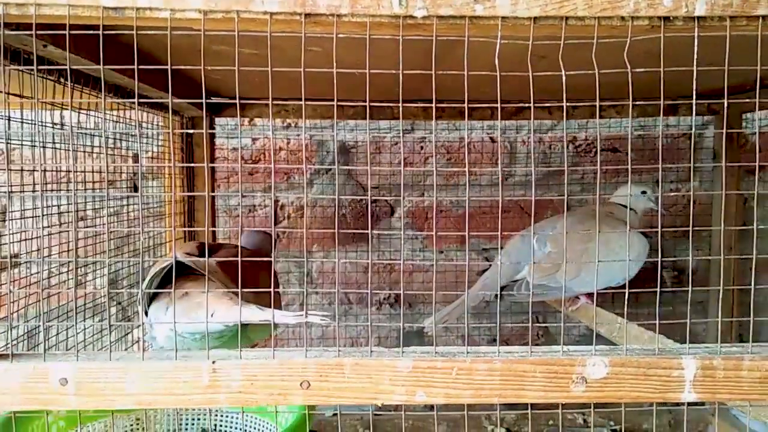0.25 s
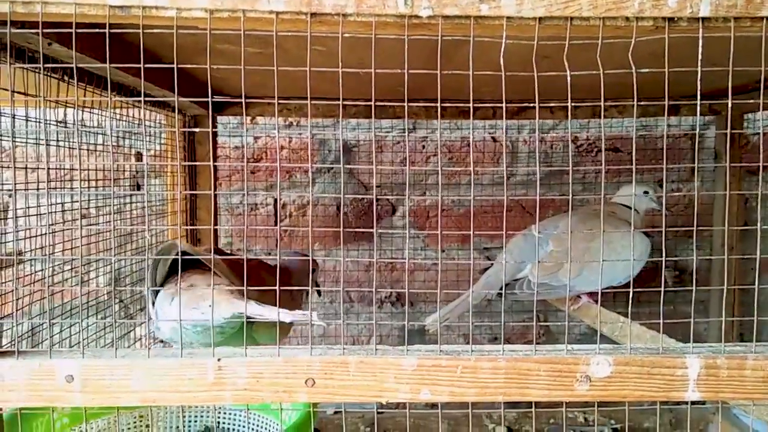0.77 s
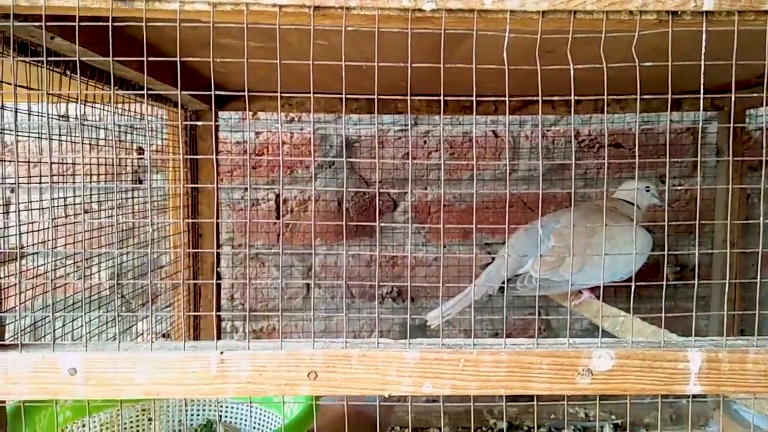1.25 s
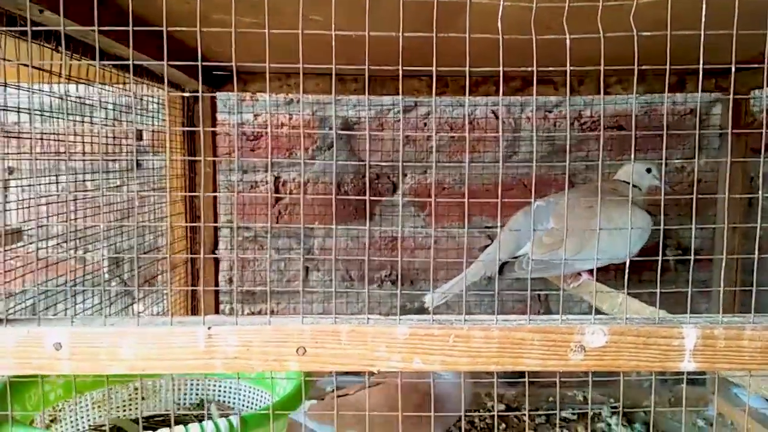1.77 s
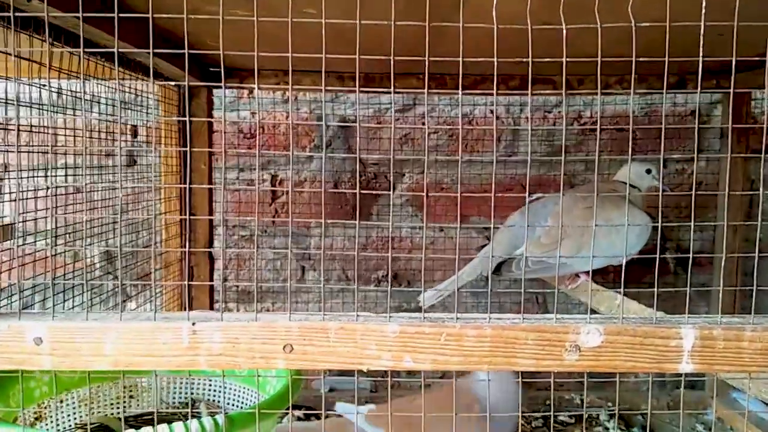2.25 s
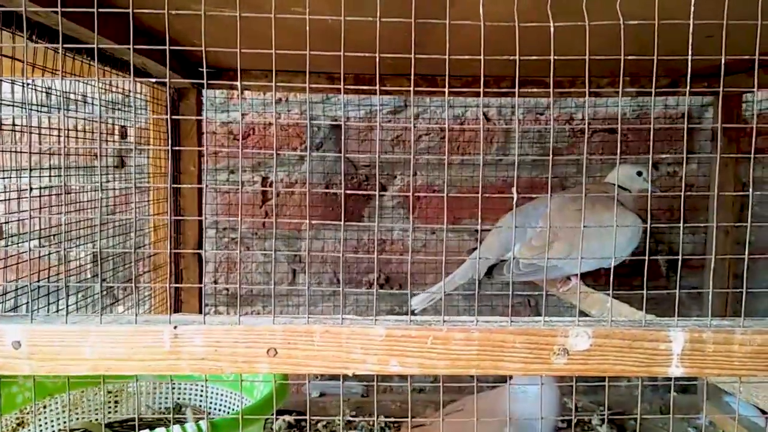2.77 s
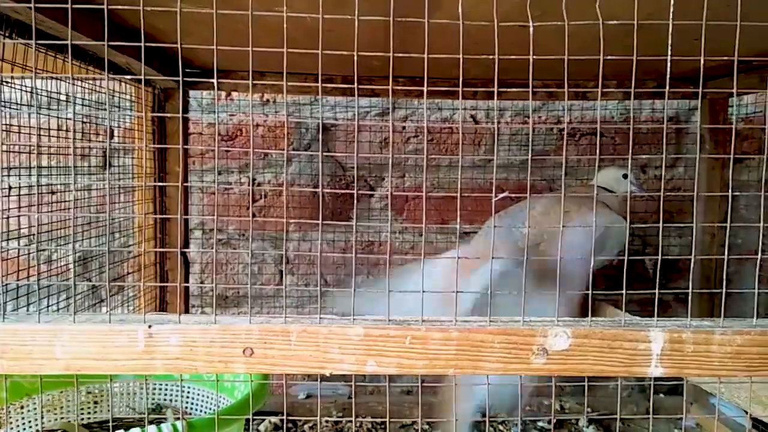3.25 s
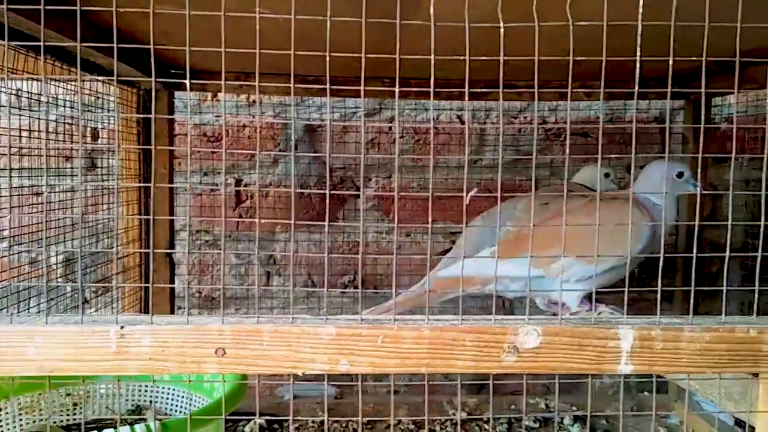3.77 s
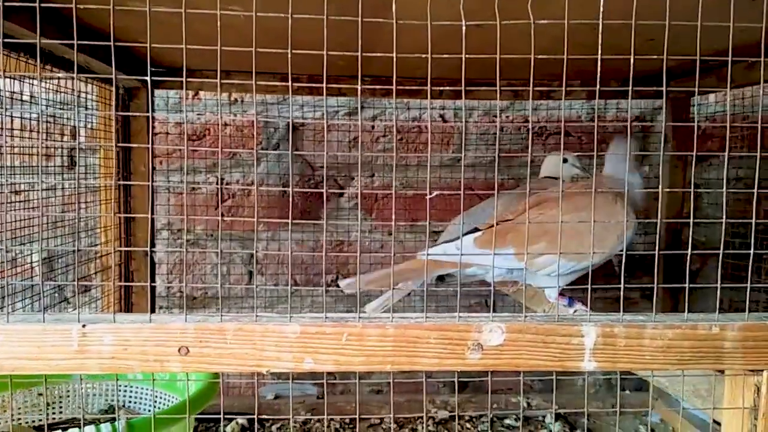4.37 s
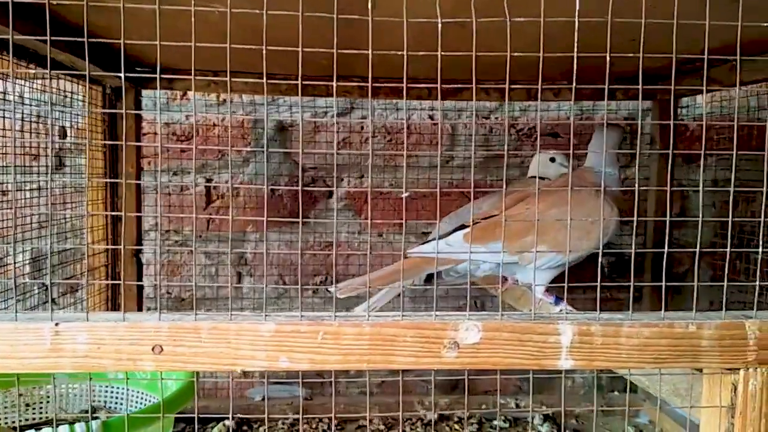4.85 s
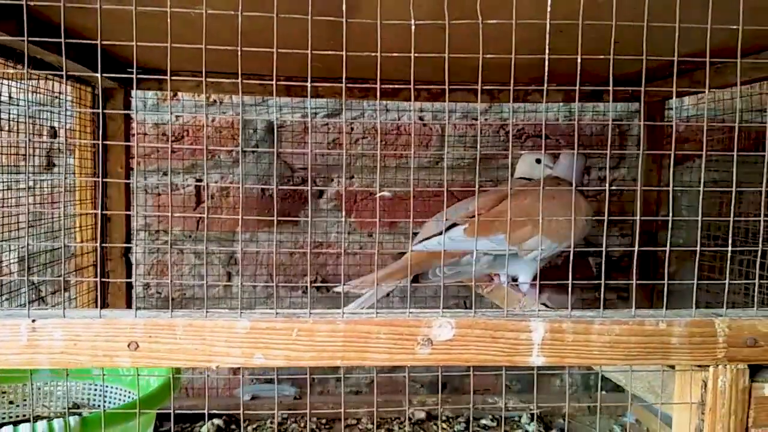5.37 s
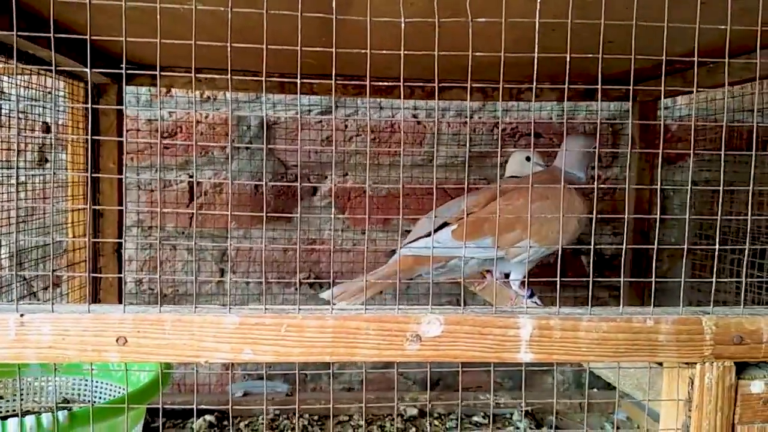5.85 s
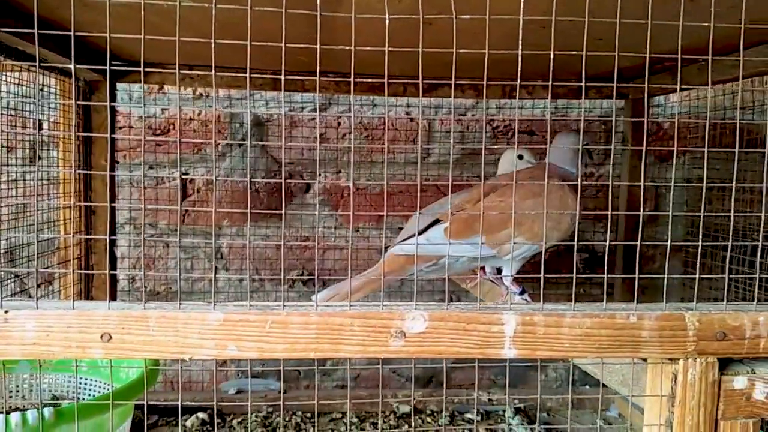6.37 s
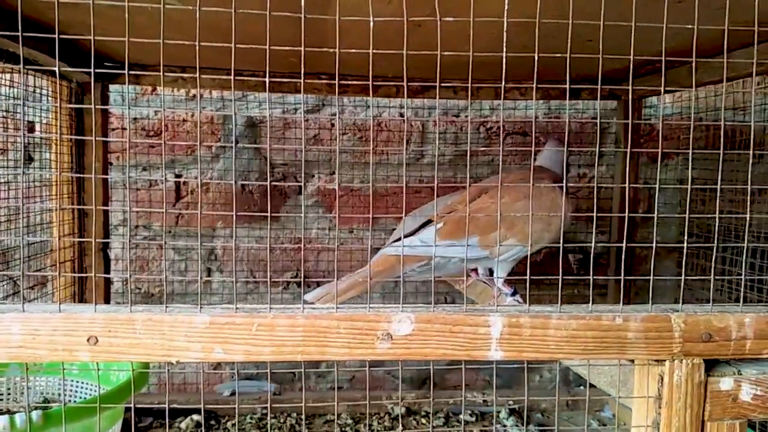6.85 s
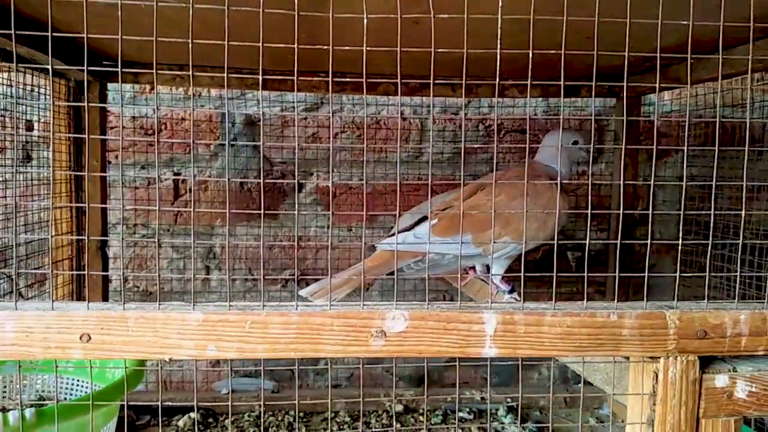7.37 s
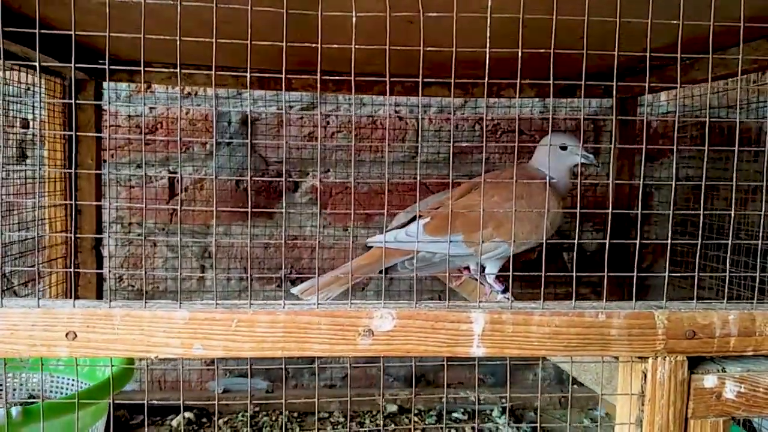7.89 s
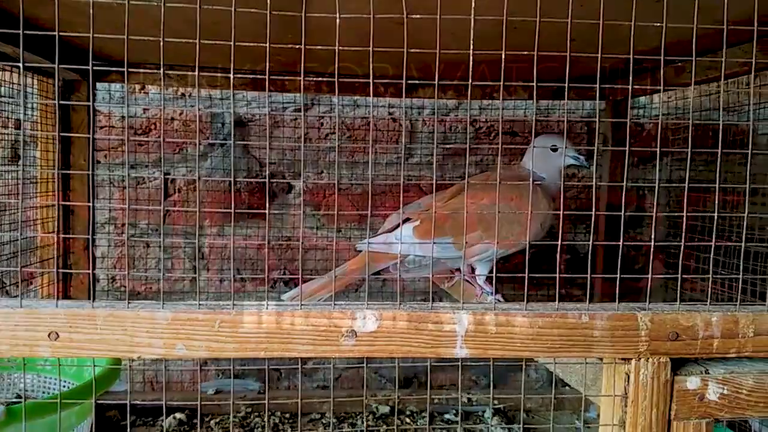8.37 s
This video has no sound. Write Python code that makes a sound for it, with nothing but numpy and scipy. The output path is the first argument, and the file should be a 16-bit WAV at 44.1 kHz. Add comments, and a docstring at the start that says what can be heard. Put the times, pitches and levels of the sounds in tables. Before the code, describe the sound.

A dove aviary against a brick wall, heard on one phone microphone with quiet rustle, low rumble and a short diffuse tail. At 0 s a low dove hoot is already sounding and droops away. From 0.4 s feet scuffle on timber, strongest near 0.6 and 1.35-1.5 s, with a deep thump. The dove coos at 0.7 (weaker start, long slack roll), 1.7 (brighter, sinking) and 2.6 s (shorter), each rolling at about forty beats a second. Between 3.2 and 5 s there are wire ticks, scratches and dull thumps near 3.7-4.2, with short hoots at 4.2 and 4.8. The three-coo phrase returns at 5.3, 6.2 and 7.2 s. A parakeet whistles downward at 5.1, then repeats a fast, raspy warble at 5.55, 5.95 and 6.4. Small chirps scatter throughout, one louder at 7.35. A woody knock at 7.8 and wire scratch at 8.45 close it.

```python
"""Dove in a wire and timber cage

A dove coos by a brick wall: a clear pitched onset, then a tone gated into a rolling beat as it sinks.
Other doves hoot and small birds chirp on gliding sines; a parakeet repeats a warbled, breathy phrase.
Feet and feathers scratch in noise bursts, knocks ring in modes and hollow boards thump as dying hums.
Rustle, low bustle and rumble are shaped noise; a diffuse tail surrounds the birds, on one phone microphone."""
import sys
import numpy as np
from scipy import signal
from scipy.fft import rfft, irfft, next_fast_len
from scipy.io import wavfile
from scipy.ndimage import uniform_filter1d, map_coordinates

SR = 44100
rng = np.random.default_rng(int(sys.argv[2]) if len(sys.argv) > 2 else 0)


def log_audio(samples):
    """Write samples as a 16-bit WAV file to the path given in sys.argv[1]."""
    # one column per channel
    frames = np.atleast_2d(samples).T
    # limit to full scale, then quantise
    limited = np.clip(frames, -1, 1)
    pcm = np.round(limited * 32767).astype(np.int16)
    wavfile.write(sys.argv[1], SR, pcm)


N = 380141
TIME = np.arange(N) / SR

# spectrum of the scratches and the background rustle: (frequency [Hz], relative density [dB])
RUSTLE_SPECTRUM = [(1500, -25.5), (2200, -15), (3270, -13), (4640, -12), (6080, -4), (8530, -1.5),
                   (11000, -10.5), (14500, -11.5)]
# modes of what feet strike, timber, perch and wire: (frequency [Hz], relative level [dB])
TIMBER = [(1080, 0), (1250, -2.9), (1500, -2.5)]
PERCH = [(1800, -0.26), (2050, -2.8), (2320, -1.7)]
WIRE = [(2950, -0.23), (3200, -0.5)]
# hollow parts of the cage: (frequency [Hz], time to fall 60 dB [s])
FLOOR = (65, 0.64)
WALL = (182, 0.23)
POST = (99, 0.085)
TRAY = (300, 0.047)


def amp(db):
    """Decibels as a linear gain."""
    return 10 ** (np.asarray(db) / 20)


def unit(x):
    """x scaled to an rms of one."""
    return x / np.sqrt(np.mean(x ** 2) + 1e-20)


def span(rows):
    """The samples that a time table covers, and its columns interpolated on them."""
    times, *columns = np.transpose(rows)
    part = slice(max(round(times[0] * SR), 0), round(times[-1] * SR))
    return part, [np.interp(TIME[part], times, column) for column in columns]


def along(points, hz):
    """(frequency [Hz], value) points read on a log frequency axis."""
    point_hz, values = np.transpose(points)
    return np.interp(np.log(hz + 1), np.log(point_hz + 1), values)


def coloured(x, spectrum):
    """x filtered through a (frequency [Hz], gain [dB]) shape."""
    size = next_fast_len(N + 8192)
    gain = amp(along(spectrum, np.fft.rfftfreq(size, 1 / SR)))
    return irfft(rfft(x, size) * gain, size)[:N]


def noise(spectrum):
    """Steady noise of unit rms with the given spectrum."""
    return unit(coloured(rng.standard_normal(N), spectrum))


def wobble(rate, size=N):
    """A smooth random curve through `rate` random knots a second."""
    knots = rng.standard_normal(int(size * rate / SR) + 4)
    return map_coordinates(knots, [np.arange(size) * rate / SR])


def tone(hz, db, overtones_db=()):
    """A sine of rms db that follows hz, with overtones relative to it and soft 0.6 ms ends."""
    turn = 2 * np.pi * np.cumsum(hz) / SR
    wave = np.sin(turn)
    for k, overtone_db in enumerate(overtones_db):
        wave = wave + amp(overtone_db) * np.sin((k + 2) * turn)
    ends = signal.windows.tukey(len(hz), min(1, 0.0012 * SR / len(hz)))
    return np.sqrt(2) * amp(db) * wave * ends


def edges(t, length, edge_s):
    """Gain that opens and shuts softly over a note."""
    return np.clip(np.minimum(t, length - t) / edge_s, 1e-4, 1)


def hoots():
    """Other doves' smooth low notes droop at the end; some waver in level, and hoarse ones shake."""
    # plain hoots: (start [s], length [s], start pitch [Hz], end pitch before the droop [Hz],
    # start level [dB], end level [dB], waver depth [dB], hoarseness [0-1])
    hoot_notes = [(0, 0.3, 474, 440.6, -22.5, -36.5, 4.5, 0.05),
                  (.198, 0.075, 544, 614, -28.5, -35.5, 8, 0.1),
                  (4.198, 0.88, 710, 634, -59.5, -52, 4.5, 0.44),
                  (4.814, 0.099, 518, 582, -34, -26, 2, 0.09), (7.729, 0.23, 621, 600, -61, -61, -5, .01)]
    waver_hz, edge_s = 8.8, 0.02
    out = np.zeros(N)
    for start, length, hz, end_hz, db, end_db, waver_db, hoarse in hoot_notes:
        part, (pitch, level) = span([(start, hz, db), (start + length, end_hz, end_db)])
        t = TIME[part] - start
        level = level - waver_db * np.sin(np.pi * waver_hz * np.maximum(t - 0.035, 0)) ** 2
        already_open_s = edge_s * (start == 0)  # a hoot at time zero is already sounding
        gain = edges(t + already_open_s, length, edge_s)
        gain = gain * (1 - hoarse + hoarse * wobble(200, len(t)))
        pitch = pitch - 45 * np.exp((t - length) / 0.018)
        pitch = pitch * (1 + 0.038 * hoarse * wobble(110, len(t)))
        out[part] += gain * tone(pitch, level)
    return out


def patchy(spectrum, patchy_db):
    """Noise of unit rms whose gain varies in patches of time and frequency."""
    z = signal.stft(rng.standard_normal(N), nperseg=512)[2]
    field = uniform_filter1d(rng.standard_normal(z.shape), 5, 0)  # smooth over frequency
    field = uniform_filter1d(field, 10, 1)  # smooth over time
    grainy = signal.istft(z * amp(patchy_db * unit(field)), nperseg=512)[1][:N]
    return unit(coloured(grainy, spectrum))


def bed():
    """Patchy rustle and low bustle share a quick unrest; the rumble is noise with its own unrest."""
    # course of the background rustle: (time [s], level [dB])
    rustle_course = [(0.0, -55.5), (0.38, -68.5), (0.6, -41), (0.84, -51.5), (1.2, -60), (1.44, -52.5),
                     (3.31, -63), (3.45, -50.5), (3.82, -70), (4.92, -54.5), (6.7, -55.5), (7.06, -65),
                     (7.75, -56), (8.28, -67.5), (8.62, -50.5)]
    # course of the rumble: (time [s], level [dB])
    rumble_course = [(0.0, -52), (0.38, -70.5), (0.65, -58), (0.84, -63), (1.41, -49.5), (1.8, -61),
                     (4.65, -68), (6.67, -64), (8.43, -70), (8.62, -61)]
    # spectrum of the low bustle: (frequency [Hz], relative density [dB])
    bustle_spectrum = [(90, -16), (150, -4), (230, -10.5), (304, -1.5), (375, -20), (450, -1), (650, -0.5),
                       (1300, -3), (2600, -8.5), (3100, -11.5), (4500, -32.5), (6500, -57)]
    # spectrum of the rumble: (frequency [Hz], relative density [dB])
    rumble_spectrum = [(20, -42), (40, -9), (62, -7), (80, -11), (140, -22.5), (250, -81)]
    rustle_db = np.interp(TIME, *np.transpose(rustle_course))
    bustle_db = -53.5 + 0.56 * (rustle_db + 54.5)  # follows the rustle less steeply
    rumble_db = np.interp(TIME, *np.transpose(rumble_course))
    unrest = 1.6 * np.tanh(wobble(22) / 1.6)
    rustle_gain = amp(rustle_db + 2.8 * unrest + 2.37 * wobble(150))
    bustle_gain = amp(bustle_db + 2.37 * unrest + 0.87 * wobble(4.5))
    rumble_gain = amp(rumble_db + 2.3 * wobble(20))
    return (rustle_gain * patchy(RUSTLE_SPECTRUM, patchy_db=4.5)
            + bustle_gain * patchy(bustle_spectrum, patchy_db=4.0)
            + rumble_gain * noise(rumble_spectrum))


def thumps():
    """Soft blows set hollow parts of the cage humming, each an uneven sine that dies away."""
    # dull thumps: (start [s], level before the soft onset [dB], hollow part that hums)
    thump_blows = [(.01, -34, WALL), (0.601, -40, FLOOR), (0.92, -45, WALL), (1.342, -33.5, FLOOR),
                   (2.553, -48.5, FLOOR), (3.717, -27.5, TRAY), (3.872, -31, TRAY), (4.029, -49, WALL),
                   (4.24, -33.5, TRAY), (6.546, -37.5, POST), (7.03, -31.5, TRAY), (7.889, -44, WALL)]
    out, t = np.zeros(N + SR), np.arange(SR // 2) / SR
    for start, db, (hz, t60) in thump_blows:
        envelope = amp(db - 60 * t / t60) * (1 - np.exp(-t / 0.0082))
        uneven = 1 + 0.45 * wobble(0.3 * hz, len(t))
        out[round(start * SR):][:len(t)] += envelope * np.sin(2 * np.pi * hz * t) * uneven
    return out[:N]


def chirps():
    """Small birds' short glides, quick to start; hoarse ones shake in level and pitch."""
    # chirps: (start [s], length [s], start pitch [Hz], end pitch [Hz],
    # level before a 3.5 dB lift [dB], octave relative to the fundamental [dB], hoarseness [about 0-1])
    chirp_notes = [(0.153, 0.033, 3150, 3450, -46, -32, 0.44), (0.54, 0.039, 1790, 1810, -48, 1.5, 0.37),
                   (2.092, 0.056, 2880, 3050, -49.5, -14, 0.27),
                   (2.148, 0.26, 3500, 3940, -57.5, -47, 0.75), (2.453, 0.013, 1440, 1370, -43, -34, 0.24),
                   (2.773, 0.059, 3440, 3500, -54.5, 0, 0.25), (2.907, 0.091, 3940, 3810, -49.5, -8.5, 1),
                   (2.982, 0.064, 3250, 3260, -51, -12, 0.87), (3.117, 0.041, 1800, 1980, -42, -4, 0.34),
                   (4.236, 0.073, 2760, 2970, -51, -14, 0.63), (4.448, 0.054, 2920, 2910, -49, -33, 0.37),
                   (4.478, 0.053, 3770, 3950, -53.5, -15, 0.24),
                   (4.851, 0.045, 3470, 3440, -39.5, -32, 0.5),
                   (5.01, 0.077, 13900, 13800, -47.5, -60, 0.1), (5.011, 0.1, 6020, 5600, -48.5, -16, 0.25),
                   (5.802, 0.04, 3390, 3500, -42, -30, 0.26), (5.597, 0.066, 1760, 1630, -43.5, -14, 0.3),
                   (6.008, 0.037, 1700, 1710, -39, -29.5, 0.38), (6.108, .03, 3176, 3590, -35.5, -15, 0.08),
                   (6.667, 0.051, 3900, 3855, -45.5, -16, 0.21), (7.296, 0.079, 1524, 2510, -39, 6, 0.49),
                   (7.277, 0.13, 2760, 3246, -43.5, -10.5, 1.1), (7.346, 0.094, 3153, 3730, -26, -23, 0.33),
                   (6.255, 0.027, 3080, 3160, -36, -43.5, 0.5),
                   (7.585, 0.043, 3340, 3550, -39.5, -41, 0.53), (7.733, 0.041, 1623, 1836, -48, 14, 0.6),
                   (8.022, 0.04, 2750, 3480, -43, -36, 0.38), (8.027, 0.041, 1794, 1900, -46.5, -4, 0.26)]
    out = np.zeros(N + SR)
    for start, length, hz, end_hz, db, octave_db, hoarse in chirp_notes:
        u = np.linspace(0, 1, round(length * SR))
        glide = (hz + (end_hz - hz) * u) * (1 + 0.069 * hoarse * wobble(450, len(u)))
        shape = np.sin(np.pi * u ** 0.81) * (1 - hoarse + hoarse * wobble(600, len(u)))
        upper_db = min(octave_db, -20)  # a strong octave does not raise the overtones above it
        note = tone(glide, db + 3.5, [octave_db, upper_db - 13.5, upper_db - 7.5])
        out[round(start * SR):][:len(u)] += shape * note
    return out[:N]


def scuffs():
    """Feet and feathers: a scratchy noise burst, a crack, and a knock ringing roughly in struck modes."""
    # scuffs: (start [s], scratch level before an 8 dB cut [dB], knock level [dB], modes of what is struck)
    scuff_hits = [(0.397, -33.5, -58, WIRE), (0.4509, -22.5, -42, PERCH + TIMBER),
                  (0.5836, -19.5, -31.5, TIMBER), (0.6596, -19, -45, TIMBER), (.9123, -29.5, -50, TIMBER),
                  (1.0924, -38, -48, TIMBER), (1.3404, -14, -26.5, WIRE + PERCH + TIMBER),
                  (1.4711, -15.5, -30, TIMBER), (1.5177, -29.5, -55, TIMBER), (1.5993, -38, -54, WIRE),
                  (1.6466, -62, -40, TIMBER), (1.6554, -32, -38.5, TIMBER), (1.8256, -25, -48, TIMBER),
                  (1.8875, -36, -36, PERCH), (2.0333, -17.5, -40.5, WIRE), (2.081, -32.5, -41, WIRE),
                  (2.5282, -34, -37, PERCH), (2.7505, -31.5, -43, TIMBER), (2.963, -32.5, -43, WIRE),
                  (3.2731, -32, -39, WIRE), (3.2905, -32.5, -42, WIRE), (3.355, -21.5, -39.5, WIRE),
                  (3.4855, -32.5, -33, WIRE), (3.367, -26.5, -41, PERCH), (3.5768, -28.5, -40, WIRE),
                  (3.588, -44, -40, WIRE), (3.7458, -42.5, -39, WIRE), (3.9644, -55, -40.5, PERCH),
                  (4.0014, -35, -51, WIRE), (4.2315, -35, -50, WIRE), (4.7179, -35, -39.5, TIMBER),
                  (4.7928, -30, -34, TIMBER), (4.8172, -31.5, -38, TIMBER), (4.9751, -34, -49, WIRE),
                  (5.3608, -66, -36.5, TIMBER), (5.779, -33.5, -55.5, PERCH), (6.8017, -31, -43, TIMBER),
                  (7.0235, -37, -45, TIMBER), (7.1054, -34.5, -41, PERCH), (7.8187, -39, -27, TIMBER),
                  (7.853, -35.5, -43, TIMBER), (8.3423, -32, -36.5, TIMBER), (8.4461, -25, -33.5, WIRE)]
    scratch, knocks, t = np.zeros(N + SR), np.zeros(N + SR), np.arange(SR // 4) / SR
    # twelve faint extra scuffs on timber at random times
    small = [(N / SR * u, -44 + 6 * v, -58 + 8 * v, TIMBER) for u, v in rng.random((12, 2))]
    for start, db, knock_db, modes in scuff_hits + small:
        first = round(start * SR)
        scratch[first:][:len(t)] += amp(db - 8 - 60 * t / 0.13) * (1 - np.exp(-t / 0.0025))
        ring = np.zeros(len(t))
        for hz, mode_db in modes:
            ring += amp(mode_db) * wobble(0.4074 * hz, len(t)) * np.sin(2 * np.pi * hz * t)
        knocks[first:][:len(t)] += amp(knock_db - 60 * t / 0.092) * (1 - np.exp(-t / 0.002)) * ring
        crack = np.gradient(wobble(7000, len(t))) * 2  # the crack of contact
        knocks[first:][:len(t)] += amp(knock_db + 4.5 - 60 * t / 0.011) * crack
    return scratch[:N] * amp(0.52 * wobble(400)) * noise(RUSTLE_SPECTRUM) + knocks[:N]


def coo_shape(start, lead, held, slide, slack, lead_hz, from_hz, to_hz, slack_hz,
              lead_db, held_db, slack_db, last_db):
    """The samples of one coo, its pitch (scooped lead, jump, slide, sinking slack roll) and level."""
    opening_hz, scoop_hz, sink_hz = 607.5, 45, 30.83
    # break: the jump in pitch; settle: the move to the held level
    attack_s, break_s, settle_s, release_s = 0.00414, 0.012, 0.067, 0.06
    silent_db = 30  # under the voice, at both ends
    jump, loosen, loose, end = start + np.cumsum([lead, held, slide, slack])
    part, (hz,) = span([(start - attack_s, opening_hz - scoop_hz),
                        (start + 0.25 * lead, opening_hz),
                        (jump, lead_hz),
                        (jump + break_s, from_hz),
                        (loosen, to_hz),
                        (loose, slack_hz),
                        (end, slack_hz - sink_hz),
                        (end + release_s, slack_hz - 2 * sink_hz)])
    times = [start - attack_s, start + attack_s, jump, jump + settle_s, loosen, loose, end, end + release_s]
    levels = [lead_db - silent_db, lead_db - 7.0, lead_db - 1.1, held_db, held_db,
              slack_db, last_db, last_db - silent_db]
    return part, hz, np.interp(TIME[part], times, levels)


def beats_done(t, first, end, *pace):
    """Beats counted from the first; the pace bends smoothly through its three values."""
    bend = np.polyfit(np.linspace(0, end - first, num=3), pace, deg=2)
    return np.where(t < first, 0.5, np.polyval(np.polyint(bend), t - first))


def dove():
    """Each beat opens the voice; as pitch sinks, beats get short and drop from a high to a low note."""
    # coos, each a clear lead note, a held roll (high and tense, or faltering), a slide
    # and a fading slack roll; levels are ahead of the throat:
    # (start [s], lead [s], held [s], slide [s], slack [s], lead end [Hz], held start [Hz],
    # held end [Hz], slack start [Hz], lead reference [dB], held [dB], slack [dB], last [dB])
    coo_notes = [(.68, 0.057, 0.066, 0.24, 0.38, 624.6, 587, 560, 687.5, -27.5, -40.5, -31, -35),
                 (1.704, 0.034, .22, 0.14, 0.28, 674, 884, 796, 661.5, -26, -27.5, -28.5, -38.5),
                 (2.644, 0.045, 0.21, 0.044, .11, 661, 832, 729.5, 672.5, -26, -26, -28.5, -32.5),
                 (5.298, 0.057, .1, 0.054, 0.45, 601, 764, 595, 659.7, -25.5, -45.5, -32.5, -34),
                 (6.237, .045, .24, .06, 0.28, 623, 789, 768, 665, -25, -24.5, -30, -34.5),
                 (7.177, 0.061, .24, 0.066, 0.056, 666, 797, 735, 651, -25.5, -25.5, -30.5, -36)]
    # roll of each coo: (first beat [s], end of the pace curve [s],
    # pace at the start [beats/s], in the middle [beats/s], at the end [beats/s])
    coo_rolls = [(.7494, 1.47, 35.8, 42, 37.75), (1.7554, 2.425, 32.4, 45.6, 35.6),
                 (2.7204, 3.13, 43.3, 42.6, 50.1), (5.3607, 6.01, 47.9, 38.1, 49.3),
                 (6.31, 6.92, 38.5, 44.4, 39.4), (7.2555, 7.655, 45.3, 39.8, 51.3)]
    # throat with the inflated crop's resonance near 595 Hz: (frequency [Hz], gain [dB])
    throat = [(300, -90.5), (400, 1.5), (500, -3.5), (560, 3.5), (595, 9), (630, 4.5), (690, -1.5),
              (770, 8.5), (900, 7.5), (1050, -14), (1500, -36.5), (3000, -9), (8000, -68)]
    # air in the dove's voice: (frequency [Hz], relative density [dB])
    breath_spectrum = [(850, -60.5), (1000, -10.5), (1500, -1.5), (1900, 9), (2600, -3), (4000, -12.5),
                       (6000, -60.5)]
    out, air = np.zeros(N), np.zeros(N)
    for coo, roll in zip(coo_notes, coo_rolls):
        part, hz, db = coo_shape(*coo)
        size, since = len(hz), TIME[part] - roll[0]
        beats = beats_done(TIME[part], *roll)
        jitter = (0.04 + 0.12 * np.exp(-since / 0.09)) * wobble(40, size)  # the first beats are less even
        place = (beats + jitter + 0.5) % 1 - 0.5  # -0.5 .. 0.5 within the beat
        rolling = np.clip(since / 0.014, 0, 1)
        slack = rolling * np.clip((770 - hz) / 110, 0, 1)
        depth = rolling * (0.93 - 0.1 * slack) * np.clip((db + 47) / 12, 0.4, 1)
        leaning = place + 0.3 * slack * (0.25 - place ** 2)  # slack beats start fast and trail off
        gate = 1 - depth + depth * np.abs(np.cos(np.pi * leaning)) ** (0.5 + 2.1 * slack)
        gate /= np.sqrt(uniform_filter1d(gate ** 2, SR // 20))  # the roll keeps the mean level
        drop = -np.tanh((place + 0.09 + 0.03 * wobble(40, size)) / 0.05)
        glide = 1 + slack * (0.105 * drop + 0.005) + 0.016 * rolling * wobble(130, size)
        glide -= 0.17 * (rolling - slack) * np.abs(2 * place) ** 5  # a tense beat sags at its edges
        uneven_db = (0.7 * rolling + 0.6 * slack) * wobble(45, size)
        husk = 1 + (0.07 + 0.13 * rolling) * wobble(260, size)  # breath roughens the roll
        out[part] += gate * amp(uneven_db) * husk * tone(hz * glide, db, [-8, -22])
        air[part] = gate * amp(db - 37)
    return coloured(out, throat) + air * noise(breath_spectrum)


def phrase(t):
    """Pitch and level of the parakeet's notes at times t; glides slow down towards their end."""
    # notes of the phrase: (time from its start [s], length [s], start pitch [Hz], end pitch [Hz],
    # start level [dB], end level [dB])
    phrase_notes = [(-.022, .022, 2420, 3900, -38, -55), (.001, 0.026, 1760, 3480, -37, -20),
                    (0.027, .009, 5140, 4927, -31, -40.5), (0.033, 0.039, 3412, 3303, -23.5, -33.5),
                    (0.061, .067, 2750, 2763, -26, -20.5), (.132, 0.0073, 2336, 2305, -15.5, -24),
                    (0.152, .055, 1780, 1723, -24, -30)]
    hz, level = np.full(len(t), 2e3), np.full(len(t), -120.)
    for start, length, from_hz, to_hz, db, end_db in phrase_notes:
        on = (t >= start) & (t < start + length)
        u = (t[on] - start) / length
        hz[on] = to_hz + (from_hz - to_hz) * (1 - u) ** 2.4
        edge_db = 20 * np.log10(edges(t[on] - start, length, edge_s=0.0021))
        level[on] = db + (end_db - db) * u + edge_db
    return hz, level


def parakeet():
    """A falling whistle and hoarse phrases; the warble swings the pitch and nearly shuts at each top."""
    # phrases: (start [s], level change [dB], time stretch [factor], last note's level change [dB])
    phrase_starts = [(5.565, 0, 1.0, 0), (5.965, -2, 1.01, 1), (6.39, 1, .965, -6)]
    # one falling whistle: (time [s], pitch [Hz], level [dB])
    whistle = [(5.095, 3300, -33), (5.108, 3210, -34), (5.135, 2790, -24), (5.155, 2403, -29.5),
               (5.19, 2343, -20.5), (5.205, 2360, -36.5), (5.25, 2250, -57)]
    # warble within the phrase: (start [s], end [s], rate [Hz], pitch swing either way [Hz])
    warble = (.064, .131, 64, 550)
    # breathy treble: (frequency [Hz], relative density or gain [dB])
    rasp = [(2240, -54.5), (3800, 4), (5300, -7.5), (6000, 8.5), (8130, -1.5), (9050, 7), (11000, -9.5),
            (13500, 1), (14600, -40)]
    last_note_s = 0.148
    out, breath, shrill = np.zeros(N), np.zeros(N), np.zeros(N)
    first, last, rate, swing = warble
    for start, db, stretch, last_db in phrase_starts:
        part = slice(round((start - 0.03) * SR), round((start + 0.22) * SR))
        t = (TIME[part] - start) / stretch
        size, early = len(t), t < last_note_s
        hz, level = phrase(t)
        turn = (rate * (t - first) % 1) ** 0.76  # falls fast, climbs slowly
        cycle = ((t > first) & (t < last)) * np.cos(2 * np.pi * turn)
        level = level + db + last_db * (t > last_note_s) - 22 * np.maximum(cycle, 0) ** 5
        dull_db = 12 * (t > first)  # clear overtones only in the opening notes
        shaky_hz = (hz + swing * cycle) * (1 + (0.004 + 0.012 * early) * wobble(500, size))
        shaky_db = level + (1 + 2 * early) * wobble(350, size)
        out[part] += tone(shaky_hz, shaky_db, [-23 - dull_db, -29 - dull_db])
        shrill_db = level - 25 + 3 * wobble(350, size)
        shrill[part] = tone(shaky_hz, shrill_db, [-1.5, 0.5, -3, -6]) * early
        breath_db = uniform_filter1d(np.maximum(level, -36), size=500) - 12
        breath[part] = amp(breath_db) * (t > 0.02) * edges(t - 0.02, 0.135, 0.01)
    out += amp(-12) * np.pad(out, (round(0.0078 * SR), 0))[:N]  # a hard wall beside its perch
    part, (hz, db) = span(whistle)
    whistle_hz = hz * (1 + 0.0085 * wobble(440, len(hz)))
    out[part] += tone(whistle_hz, db + 2 * wobble(200, len(hz)), [-30, -46, -32])
    return out + coloured(shrill, rasp) + breath * amp(2.5 * wobble(300)) * noise(rasp)


def echoes(x):
    """x with weak delayed copies from the cage's timber and the wall."""
    # reflections: (delay [s], level [dB])
    reflections = [(.0031, -12), (.0058, -14), (.0092, -15), (.0137, -17), (.019, -19)]
    return x + sum(amp(db) * np.pad(x, (round(delay * SR), 0))[:N] for delay, db in reflections)


def yard(x):
    """Diffuse tail of noise, 9 ms late, in which each frequency dies at its own speed."""
    # decay of the tail: (frequency [Hz], time to fall 60 dB [s])
    decay = [(300, .3), (1700, .38), (2400, .6), (3400, .33), (14000, .2)]
    hz, t, z = signal.stft(rng.standard_normal(SR), SR, nperseg=256)
    fade = amp(-60 * t / along(decay, hz)[:, None])
    tail = signal.istft(z * fade, SR, nperseg=256)[1]
    return signal.fftconvolve(np.pad(x, (400, 0)), tail / np.linalg.norm(tail))[:N]


def scene():
    """The voices and scuffs, their sends to the diffuse tail, and the bed beneath."""
    near = echoes(dove()) + hoots()
    far = parakeet() + chirps()
    feet = scuffs() + thumps()
    wet = amp(-23) * near + amp(-14.5) * far + amp(-14) * feet
    return (near + far + feet + yard(wet) + bed())[None]


def record(dry):
    """The phone keeps nothing above its band limit."""
    top_hz = 14400
    size = next_fast_len(N + 8192)
    kept = np.fft.rfftfreq(size, 1 / SR) < top_hz
    return irfft(rfft(dry, size) * kept, size)[:, :N]


dry = scene()
out = record(dry)
log_audio(out)
```